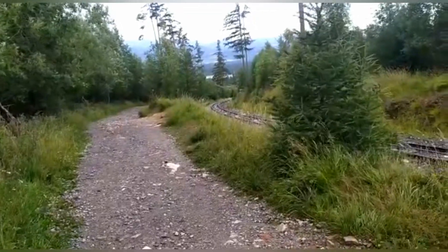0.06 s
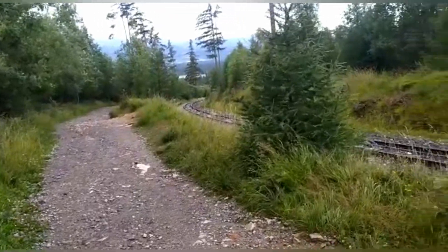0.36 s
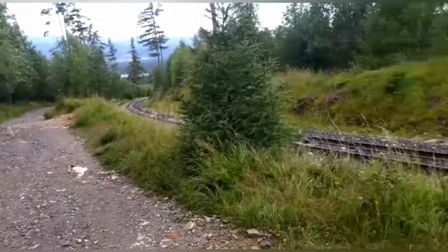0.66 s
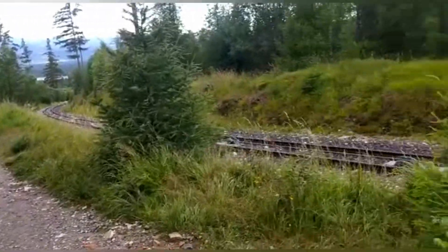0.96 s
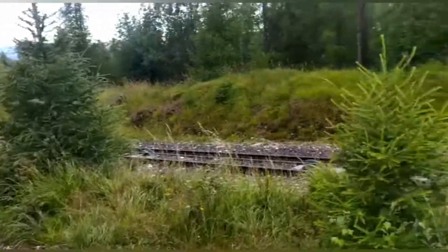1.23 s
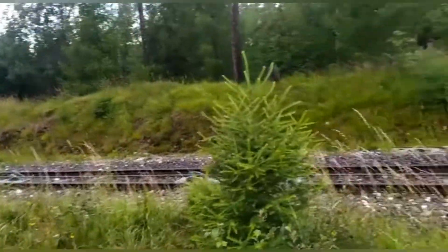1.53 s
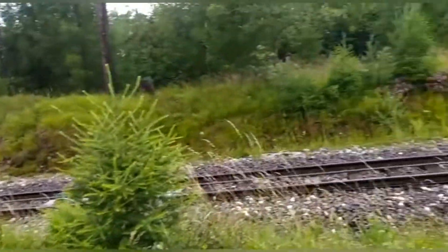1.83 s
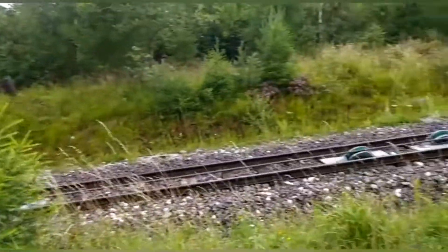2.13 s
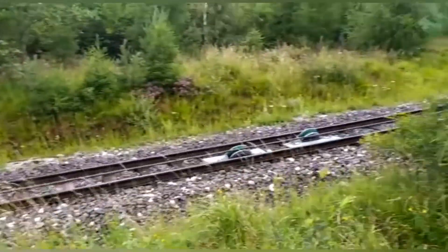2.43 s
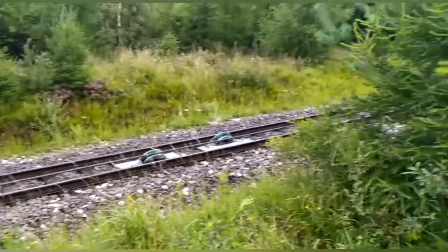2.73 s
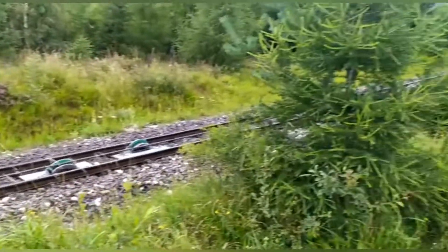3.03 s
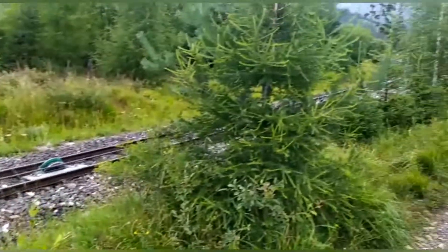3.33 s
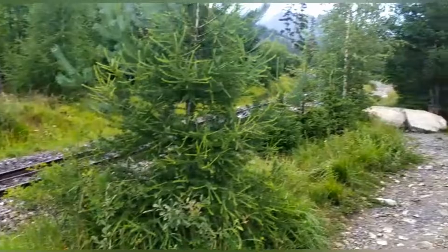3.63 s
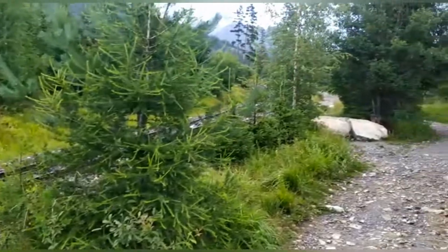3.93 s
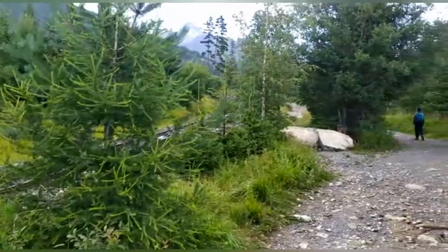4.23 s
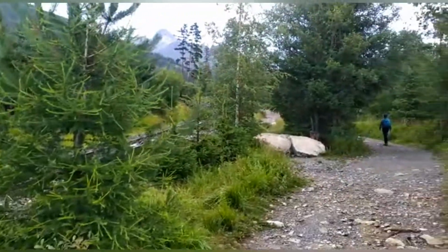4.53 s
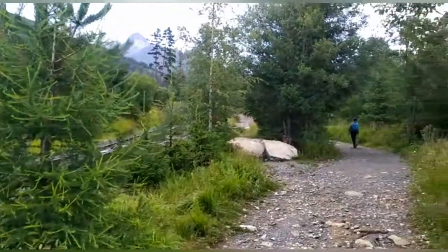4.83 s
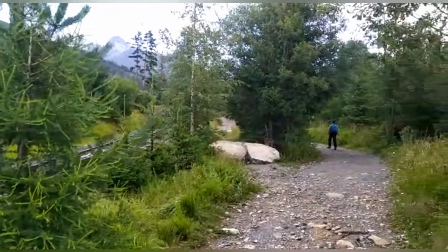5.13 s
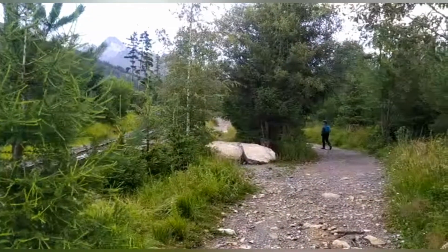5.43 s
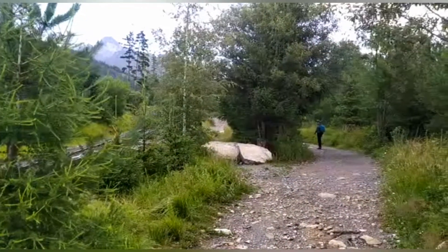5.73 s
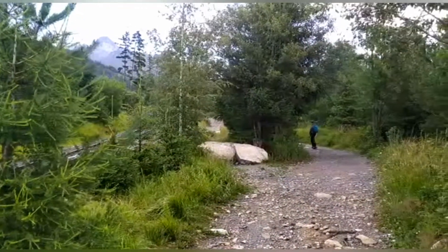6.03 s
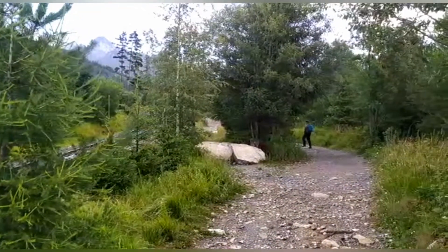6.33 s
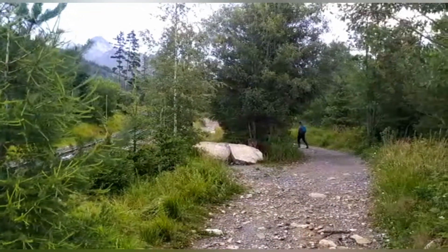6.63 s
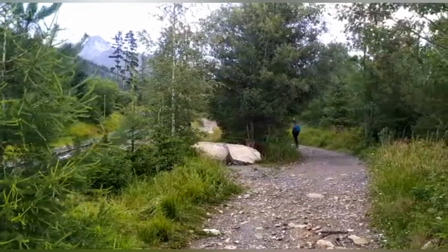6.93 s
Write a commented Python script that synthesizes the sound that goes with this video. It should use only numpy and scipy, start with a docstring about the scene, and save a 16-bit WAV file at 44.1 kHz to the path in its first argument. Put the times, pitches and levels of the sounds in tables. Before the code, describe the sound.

A running haul cable rumbles and hisses over guide wheels, one rattling quickly and metallically, while wind gusts buffet the microphone.

```python
"""Beside a funicular track, the haul cable rumbles and hisses over its guide wheels as a breeze flutters.
From the start, one worn wheel rattles and thumps once a turn, about seven times a second.
Gusts soon buffet a hand-held camera, mostly at its right microphone, and its case ticks in the hand.
Around 3-4 s the wind drops while the camera swings from facing downhill to facing uphill.
Near 5 s the case ticks again and the gusts return, hardest at 6 s; a few last ticks follow."""
import sys
import numpy as np
from scipy import signal
from scipy.fft import rfft, irfft
from scipy.io import wavfile
from scipy.ndimage import uniform_filter1d, map_coordinates

SR = 44100
rng = np.random.default_rng(int(sys.argv[2]) if len(sys.argv) > 2 else 0)


def generate_wav(signal):
    """Clip the signal to [-1, 1] and save it as 16-bit WAV at the path in sys.argv[1]."""
    frames = np.transpose(np.atleast_2d(signal))
    scaled = np.clip(frames, -1, 1) * 32767
    pcm = np.round(scaled).astype(np.int16)
    wavfile.write(sys.argv[1], SR, pcm)


N = 311346
T = np.arange(N) / SR
HZ = np.fft.rfftfreq(N, 1 / SR)


def amp(db):
    """Turns decibels into a gain."""
    return 10 ** (np.asarray(db) / 20)


def unit_rms(x):
    """Scales a signal to an average power of one."""
    return x / np.sqrt(np.mean(x ** 2) + 1e-20)


def curves(rows):
    """Joins the rows of a table into one curve over time per column."""
    times, *columns = np.transpose(rows)
    return [np.interp(T, times, column) for column in columns]


def spectra(rows):
    """Turns each dB column of a table into a gain for every frequency."""
    hz, *columns = np.transpose(rows)
    return [amp(np.interp(np.log(HZ + 1), np.log(hz), column)) for column in columns]


def colour(x, gain):
    """Filters a sound by giving each frequency its own gain."""
    return irfft(rfft(x) * gain, N)


def wander(hz):
    """A smooth random wobble, with speeds up to about hz."""
    return unit_rms(colour(rng.standard_normal(N), np.exp(-(HZ / hz) ** 2)))


def add(mix, start_s, sound):
    """Mixes a sound in at the given time."""
    part = mix[..., max(round(start_s * SR), 0):][..., :sound.shape[-1]]
    part += sound[..., :part.shape[-1]]


def stereo_noise(alike):
    """White noise, left and right: unrelated at alike=0, the same at 1."""
    shared, own = rng.standard_normal((2, N))
    return np.array([alike * shared + np.sqrt(1 - alike ** 2) * own, shared])


def shaped_noise(rows, alike):
    """Stereo noise with a table's spectrum, read as dB in each 1 Hz band."""
    return colour(stereo_noise(alike), spectra(rows)[0] * np.sqrt(SR / 2))


# tone of the rumble: f/Hz, level/dB
RUMBLE_TONE = [(20, -104), (31, -91), (42, -79), (70, -63), (115, -68), (155, -81), (215, -75.5),
               (290, -81), (370, -78), (450, -85), (700, -84.5), (860, -78), (1050, -92.5), (1280, -84),
               (1650, -97.5), (5000, -102), (16000, -122)]
# its deep part swells and ebbs: t/s, level/dB
BASS_SWELL = [(0, -13), (1.9, -4), (2.6, 3.5), (3.25, -4.5), (3.7, 1.5), (4.6, 1)]
def rumble(deep_hz=110):
    """The running cable and the open air make a low, unsteady rumble."""
    noise = shaped_noise(RUMBLE_TONE, alike=0.73) * amp(wander(11))
    bass = colour(noise, np.exp(-(HZ / deep_hz) ** 4))
    return noise + (amp(*curves(BASS_SWELL)) - 1) * bass


# tone of the roar: f/Hz, level/dB
ROAR_TONE = [(300, -100), (620, -94), (820, -87), (1080, -89.5), (1500, -91), (2200, -90), (4000, -115)]
# it fades as the camera turns away: t/s, level/dB
ROAR_FADE = [(0, 5), (1.1, 5.5), (2.7, 1), (3.5, -0.5), (4, -3.5), (7.06, -4)]
def wheel_roar():
    """The long row of guide wheels roars as it rolls."""
    level_db, = curves(ROAR_FADE)
    return shaped_noise(ROAR_TONE, alike=0.28) * amp(level_db + wander(30))


# tone of the hiss: f/Hz, level/dB
HISS_TONE = [(1000, -110), (2100, -97), (2600, -95.5), (3400, -90.5), (4300, -93), (5500, -93.5),
             (6700, -96), (8800, -97.5), (11000, -103), (14000, -112), (16000, -121)]
# it eases along with the roar: t/s, level/dB
HISS_FADE = [(0, 1.5), (3.6, 1.7), (4.7, -1.5), (7.06, -1)]
def cable_hiss():
    """The cable hisses in the grooves of the wheels."""
    level_db, = curves(HISS_FADE)
    return shaped_noise(HISS_TONE, alike=0.067) * amp(level_db + 1.9 * wander(22))


# a low note and its octave: f/Hz, level/dB
DRONE_NOTES = [(193.5, -56), (387, -72.5)]
def cable_drone(waver=0.0045):
    """The running cable hums, wavering a little in pitch and loudness."""
    clock = np.cumsum(1 + waver * wander(2.76)) / SR
    hum = sum(amp(db) * np.sqrt(2) * np.sin(2 * np.pi * hz * clock) for hz, db in DRONE_NOTES)
    return hum * amp(0.62 * wander(11))


def resonate(x, hz, width_hz):
    """Keeps one band around the moving pitch hz, filtering twice for steeper sides."""
    spin = np.exp(2j * np.pi * np.cumsum(hz) / SR)
    feedback = np.exp(-np.pi * width_hz / SR)
    for _ in range(2):
        x = 2 * (spin * signal.lfilter([1 - feedback], [1, -feedback], x / spin)).real
    return x


# a hollow band that sinks as the camera turns: t/s, level/dB, f/Hz
HOLLOW_BAND = [(0, -98.5, 1070), (.6, -84, 1182), (1, -79, 1160), (1.6, -79, 960), (2.2, -83, 950),
               (2.65, -80.5, 952), (3.4, -83.5, 968), (3.9, -88, 890), (4.6, -100, 863)]
def hollow_ring(width_hz=430, flicker_db=3.5, waver=0.073):
    """The rolling wheels resound in one broad band that glides and judders."""
    level_db, hz = curves(HOLLOW_BAND)
    hz = hz * (1 + waver * wander(21))
    noise = stereo_noise(alike=0.32) * np.sqrt(SR / 2)
    return amp(level_db + flicker_db * wander(45)) * resonate(noise, hz, width_hz)


# the breeze at the right microphone: t/s, level/dB, f/Hz
FLUTTER_NOTE = [(1.1, -42.5, 78.35), (1.19, -36.5, 87.7), (1.3, -47, 72.7), (1.41, -31.5, 80.6),
                (1.5, -45, 74.4), (1.62, -26, 76.6), (1.76, -32.5, 87.1), (1.88, -38, 78.7), (2, -56, 65),
                (2.3, -43.5, 73.4), (2.95, -41, 70), (3.1, -73, 72)]
def breeze_flutter(waver=0.03, left_db=-18):
    """Swirls of air leave the camera's edge at a nearly even pace, making a low note."""
    level_db, hz = curves(FLUTTER_NOTE)
    cycles = np.cumsum(hz * (1 + waver * wander(12))) / SR
    note = np.sqrt(2) * np.sin(2 * np.pi * cycles)
    return amp([[left_db], [0]]) * amp(level_db + 1.9 * wander(33)) * note


TURN_S = 0.137307  # the cable's even speed makes every turn equally long
TURN_STARTS = np.arange(0.0825, N / SR, TURN_S)
# knocks within one turn: t/s from the turn's start, level/dB, fade time/s
RIM_KNOCKS = [(-.011, -5.5, 0.0035), (0, -3, 0.015), (.0045, 5.5, 0.0038), (0.0134, -3, 0.037),
              (0.027, -22, .012), (.0475, -9, 0.0015), (.064, -17, 0.0015)]
# louder when the camera points at the worn wheel: t/s, level/dB
WHEEL_LEVEL = [(0, -46.5), (.7, -45.5), (1.32, -43), (1.46, -40), (1.6, -40), (1.87, -38.5), (2.07, -43),
               (2.56, -38), (2.7, -39), (2.83, -41.5), (2.96, -42), (3.1, -38.5), (3.24, -40), (3.38, -36),
               (3.53, -42), (3.93, -44), (4.2, -46), (4.34, -44), (4.48, -46), (5.3, -46), (5.75, -43.5),
               (6.3, -43.5), (7.06, -39.5)]
def rim_chatter(attack_s=0.0007, scatter_db=0.5, looseness=0.098, grit_db=0.5):
    """The worn wheel's loose rim knocks several times a turn, each a gritty burst of noise."""
    power, t = np.zeros(N), np.arange(SR // 7) / SR
    levels = np.interp(TURN_STARTS, *np.transpose(WHEEL_LEVEL))
    levels += scatter_db * rng.standard_normal(len(levels))
    for start, turn_db in zip(TURN_STARTS, levels):
        for delay, knock_db, fade_s in RIM_KNOCKS:
            knock = amp(turn_db + knock_db) * (1 - np.exp(-t / attack_s)) * np.exp(-t / fade_s)
            delay *= 1 + looseness * rng.standard_normal()  # later knocks keep looser time
            add(power, start + delay, knock ** 2)
    return stereo_noise(alike=0.65) * np.sqrt(power) * amp(grit_db * wander(1600))


# overall tone of the rattle: f/Hz, level/dB
RATTLE_TONE = [(200, -19), (1100, -4), (1650, -5), (2100, 3.5), (2550, 1.5), (3300, -10.5), (4000, 3),
               (5000, -1.5), (5900, -2.5), (6600, -3), (8500, -5.5), (11000, -10.5), (14000, -17),
               (16000, -51)]
# the wheel's ringing notes: f/Hz, width/Hz, level/dB facing downhill, level/dB facing uphill
WHEEL_NOTES = [(2740, 60, 1, -12), (2810, 60, -10, -1), (3190, 55, -7, 2), (3490, 80, 4, 0),
               (3615, 45, -10, -2), (4230, 45, 0, 3), (4600, 90, 9, 6), (4852, 42, 11.5, 9),
               (5055, 40, 4, 4), (5170, 35, 6, 4), (5320, 70, 2, -6), (5502, 55, 6, 9.5),
               (5880, 55, 7, 9.5), (6340, 50, 2, -6), (6650, 50, -12, -1), (6888, 40, 4, 7),
               (7160, 45, -1, -15), (7700, 55, -8, 3), (8050, 110, -1, -7), (8650, 50, -1, -15),
               (9520, 80, -4, -10), (10000, 130, -5, 2), (10700, 70, -2, -3), (11570, 180, -6, 2),
               (12050, 140, -4, 2)]
def wheel_rattle(level_db=2, ring_db=2):
    """The knocks set the metal wheel ringing at many pitches."""
    rings = sum(amp([[down_db], [up_db]]) / (1 + 2j * (HZ - hz) / width)
                for hz, width, down_db, up_db in WHEEL_NOTES)
    tone = spectra(RATTLE_TONE)[0] * (1 + amp(ring_db) * rings)
    downhill, uphill = tone / np.sqrt(np.mean(abs(tone) ** 2, axis=1, keepdims=True))
    return amp(level_db) * camera_swing(rim_chatter(), downhill, uphill)


# boosts and cuts to the rattle: t/s, clang level/dB, sizzle level/dB
RATTLE_SHINE = [(0, -2, -3), (1.5, -1, -0.5), (1.85, -1.5, 1.5), (2.2, -1.5, 3.5), (2.5, 0.5, -2),
                (2.86, 4.5, -2.5), (3.12, 1.5, -2.5), (3.38, 1.5, 1.5), (4, 4.5, 1.5), (5.1, 1.5, 4.5),
                (5.8, 0.5, 0.5), (7.06, -1.5, -2.5)]
def clang_and_sizzle(rattle, clang_hz=4780, width_hz=950, sizzle_hz=6500):
    """The rattle's clang and top treble swell and fade over time."""
    clang_db, sizzle_db = curves(RATTLE_SHINE)
    clang = colour(rattle, np.exp(-((HZ - clang_hz) / width_hz) ** 2))
    sizzle = colour(rattle, 1 - np.exp(-(HZ / sizzle_hz) ** 8))
    return rattle + (amp(clang_db) - 1) * clang + (amp(sizzle_db) - 1) * sizzle


# the cable's ring, strongest when the camera faces it: t/s, level/dB, f/Hz
CABLE_SONG = [(0, -1.5, 3300), (1.4, -9, 3240), (1.8, 7, 3113), (2.6, 5.5, 3330), (3.2, -1.5, 3360),
              (3.7, 4, 3200), (4.6, 0.5, 3300), (7.06, -9, 3300)]
def cable_singing(rattle, boost_db=8, width_hz=560, echo_s=0.06):
    """Each knock shakes the tight cable, which rings on in one metallic band."""
    level_db, hz = curves(CABLE_SONG)
    t = np.arange(SR // 8) / SR
    tail = rng.standard_normal((2, len(t))) * np.exp(-t / echo_s)
    tail /= np.linalg.norm(tail, axis=1, keepdims=True)
    echoes = signal.oaconvolve(rattle, tail, axes=1)[:, :N]  # these run along the cable
    return amp(level_db + boost_db) * resonate(rattle + 0.5 * echoes, hz, width_hz)


# a strong and a weak push each turn: t/s from the turn's start, level/dB, timing scatter/s
WHEEL_PUSHES = [(-.004, 2.5, 0.00075), (0.06, -14, 0.00356)]
# low notes of the track bed: f/Hz, level/dB, time to fade by 60 dB/s
BED_NOTES = [(61.8, -39.5, 0.26), (77.8, -49.5, 0.62), (108.3, -38, 0.082), (180, -39, 0.056)]
def wheel_thumps(level_db=1.5, scatter_db=2, rise_s=0.0059, follow=0.2):
    """The wheel is not quite round, so it pushes on the track bed, which booms briefly."""
    out, t = np.zeros(N), np.arange(SR // 2) / SR
    thump = -sum(amp(db - 60 * t / fade_s) * np.sin(2 * np.pi * hz * t) for hz, db, fade_s in BED_NOTES)
    thump *= 1 - np.exp(-t / rise_s)
    for start in TURN_STARTS:
        for delay, db, scatter_s in WHEEL_PUSHES:
            size, slip = rng.standard_normal(2)
            add(out, start + delay + scatter_s * slip, amp(db + scatter_db * size) * thump)
    wheel_db, = curves(WHEEL_LEVEL)
    swell_db = follow * (wheel_db - wheel_db.mean())  # a share of the rattle's rise and fall
    return amp(level_db + swell_db) * colour(out, 1 - np.exp(-(HZ / 45) ** 6))


# single gusts: t/s, level/dB, half length/s, brightness/dB, f/Hz, glide/(Hz per s)
WIND_GUSTS = [(0.335, -27, 0.028, 0.5, 80.2, -400), (0.483, -23.5, 0.043, 5.5, 120.9, 452.5),
              (0.641, -19, 0.011, 8.5, 128.8, 0), (.659, -21, .012, 7, 252, 0),
              (0.827, -25, 0.026, 5, 223.6, -3), (0.911, -26, 0.02, 0, 102.4, -300),
              (1.063, -28.5, 0.023, -2.5, 130.7, -300), (1.61, -31, 0.04, 3.5, 150, -10),
              (2.112, -31, 0.02, 5, 151.6, 5), (4.934, -42, 0.12, -6, 69.83, -0.5),
              (5.211, -29.5, 0.042, -4.5, 89.9, -4), (5.474, -18.5, 0.011, 0, 116, -400),
              (5.505, -24, .01, 8, 165, -9.5), (5.575, -25, .018, -4, 116, 0),
              (5.641, -17.5, 0.016, -8, 98.9, 597), (5.745, -18, 0.028, -12, 71.2, 591),
              (5.828, -15, 0.025, 14, 117.8, 892), (5.872, -14.5, .012, 18, 160.6, 0),
              (5.92, -16.5, 0.027, 11, 184.4, -900), (5.978, -6.5, 0.018, 11, 138.4, -600),
              (6.018, -9, 0.021, 3, 80.7, -200), (6.144, -21, 0.06, -6, 78.14, -200),
              (6.26, -18.5, .03, -0.5, 83, -700), (6.434, -22.5, 0.024, -10, 60.8, 0),
              (6.625, -17, 0.021, -4, 94.6, 3), (6.754, -23, 0.022, -8, 74.6, 0),
              (6.892, -26.5, 0.028, -8, 69.6, -4), (7.039, -20, 0.038, -6.5, 54.8, -2)]
def gust_notes(waver=0.0725, lumpy_db=1.5, octave_db=-11):
    """Each gust sheds a row of swirls: a short, throaty note, with more octave if the gust is sharp."""
    out = np.zeros(N)
    drift = 1 + waver * wander(40)
    lumps = amp(lumpy_db * wander(62))
    for peak_s, db, length, bright_db, hz, glide in WIND_GUSTS:
        near = abs(T - peak_s) < 3.5 * length
        t = T[near] - peak_s
        phase = 2 * np.pi * (rng.random() + np.cumsum((hz + glide * t) * drift[near]) / SR)
        octave = amp(octave_db) / (1 + amp(-bright_db))
        swell = amp(db) * np.exp(-0.5 * (t / length) ** 2)
        out[near] += swell * np.sqrt(2) * (np.sin(phase) + octave * np.sin(2 * phase))
    return out * lumps


def rough_air(tone, lumpy_db, lumpy_hz):
    """Churning air makes low noise; slow swings are evened out and quick lumps added."""
    noise = colour(stereo_noise(alike=0.45), spectra(tone)[0])
    noise /= np.sqrt(uniform_filter1d(noise ** 2, size=1800, axis=1) + 1e-20)
    return noise * unit_rms(amp(lumpy_db * wander(lumpy_hz)))


# tones of the wind's deep push and of its small swirls: f/Hz, level/dB
PUSH_TONE = [(20, -60), (31, -27), (41, -13), (55, 2.5), (85, 2.5), (130, -3), (190, -14.5), (300, -28),
             (600, -51), (1500, -97)]
SWIRL_TONE = [(50, -16), (110, -2), (165, 4.5), (245, -1), (320, -9.5), (450, -16.5), (620, -24.5),
              (900, -39.5), (1500, -56), (4000, -62.5)]
# the wind between gusts: t/s, level/dB
BREEZE_LEVEL = [(.15, -74), (.4, -47), (.9, -34.5), (1.25, -40.5), (2.25, -36), (2.7, -45.5), (3, -58),
                (4.8, -60.5), (5.35, -29), (5.6, -25.5), (5.75, -19.5), (5.95, -24), (6.08, -25),
                (6.33, -31), (6.52, -43), (6.8, -36), (7.06, -37)]
# the left microphone is sheltered, except just after the swing: t/s, level/dB
LEFT_WIND = [(4.3, -25), (4.92, 9.5), (5.2, -8.5), (5.5, -15.5), (6.3, -23.5), (7.06, -14)]
def wind(level_db=-1, swirl_db=-7, note_share=0.47):
    """Breeze and gusts push on the microphones; sharper ones shed small swirls that sound higher."""
    breeze_db, = curves(BREEZE_LEVEL)
    breeze_power = amp(breeze_db + 0.5 * wander(8)) ** 2
    breeze_bright_db = -3 + 0.5 * (breeze_db - breeze_db.max())  # stronger is brighter
    blows = [(breeze_power, breeze_bright_db)]
    for peak_s, db, length, bright_db, *_ in WIND_GUSTS:
        power = (1 - note_share) * amp(db) ** 2 * np.exp(-((T - peak_s) / length) ** 2)
        blows.append((power, bright_db))
    push, swirl = np.zeros((2, N))
    for power, bright_db in blows:
        swirl_to_push = amp(swirl_db + bright_db) ** 2
        push += power / (1 + swirl_to_push)
        swirl += power * swirl_to_push / (1 + swirl_to_push)
    air = np.sqrt(push) * rough_air(PUSH_TONE, lumpy_db=1, lumpy_hz=30.2)
    air += np.sqrt(swirl) * rough_air(SWIRL_TONE, lumpy_db=2.5, lumpy_hz=71)
    air += np.sqrt(note_share) * gust_notes()
    air[0] *= amp(*curves(LEFT_WIND))
    return amp(level_db) * colour(air, 1 - np.exp(-(HZ / 37) ** 6))  # the deepest bass cannot get in


# ticks and creaks: t/s, level/dB, f/Hz, time to fade by 60 dB/s, left minus right/dB
CASE_TICKS = [(1.3665, -11.5, 890, 0.0015, 24), (1.3667, -13, 1990, 0.0011, 24),
              (1.367, -30, 318, 0.015, 23), (1.5407, -20.5, 640, 0.0044, 26),
              (5.0054, -2, 3060, 0.00053, 31), (6.317, -21, 1350, 0.00097, 18),
              (6.394, -33, 2130, 0.021, -21), (6.3973, -35.5, 1006, 0.019, -12),
              (6.3997, -31.5, 2240, 0.023, -19)]
def case_ticks():
    """The case gives under the fingers: very short rings, each close to one microphone."""
    out, t = np.zeros((2, N)), np.arange(SR // 20) / SR
    for start, db, hz, fade_s, side_db in CASE_TICKS:
        ring = amp(db - 60 * t / fade_s) * np.sin(2 * np.pi * hz * t)
        band = signal.butter(3, [hz / 2, min(3 * hz, 12000)], "band", fs=SR, output="sos")
        sides = amp(np.minimum([[side_db], [-side_db]], 0))
        add(out, start, sides * signal.sosfilt(band, ring))
    return out


# where the camera points: t/s, direction (0 downhill, 1 uphill)
FACING = [(2.7, 0.19), (4.3, 0.82)]
def camera_swing(x, downhill, uphill):
    """As the camera turns, a sound's downhill tone blends toward its uphill tone."""
    facing, = curves(FACING)
    return (1 - facing) * colour(x, downhill) + facing * colour(x, uphill)


# tone on the left side: f/Hz, level/dB facing downhill, level/dB facing uphill
LEFT_TONE = [(99, 3.5, -2), (460, -7, 1), (820, -3.5, -0.5), (1160, -16, 1.5), (1690, -12, -5),
             (2370, -13, -4.5), (3320, -2.5, 3), (3780, -1, 1.5), (4800, -8, -1.5), (5860, -12.5, 2.5),
             (6300, -22, -7.5), (7900, -26, -9.5), (10400, -16, -21)]
# how much later the left side hears the track (below zero is earlier): t/s, delay/ms
LEFT_DELAY = [(0, -.18), (1.1, -.33), (1.6, -.28), (2.1, -.12), (2.6, .07), (3, .25), (3.8, .39),
              (4.6, .45)]
def dull_and_shift_left(track, in_step_hz=4560):
    """The left side sounds duller, most of all above 6 kHz and early on; it first leads, then lags."""
    delay_ms, = curves(LEFT_DELAY)
    left = camera_swing(track[0], *spectra(LEFT_TONE))
    low = colour(left, np.exp(-(HZ / in_step_hz) ** 20))  # only this part is shifted in time
    shifted = map_coordinates(low, [(T - delay_ms / 1000) * SR], order=3, mode="mirror")
    return np.array([shifted + left - low, track[1]])


def shimmer(x, depth_db, frames):
    """Narrow bands above the bass drift louder and softer, over a span of frames (about 3 ms each)."""
    hz, _, bands = signal.stft(x, SR, nperseg=512, noverlap=384)
    drift = uniform_filter1d(rng.standard_normal(bands.shape[:0:-1]), size=frames, axis=0)
    drift = unit_rms(uniform_filter1d(drift, size=2, axis=1)).T
    above_bass = np.clip((hz - 400) / 500, 0, 1)[:, None]
    bands *= amp(depth_db * above_bass * drift)
    return signal.istft(bands, SR, nperseg=512, noverlap=384)[1][:, :N]


def scene():
    """The track as the two microphones hear it, plus the air and fingers on the camera itself."""
    rattle = wheel_rattle()
    metal = shimmer(clang_and_sizzle(rattle) + cable_singing(rattle), depth_db=2.5, frames=70)
    cable = shimmer(rumble() + wheel_roar() + cable_hiss() + cable_drone(), depth_db=1.9, frames=40)
    track = metal + cable + hollow_ring() + wheel_thumps()
    return dull_and_shift_left(track) + wind() + breeze_flutter() + case_ticks()


def record(dry):
    """Cuts off the very highest treble, above 15650 Hz."""
    low_pass = signal.firwin(511, 15650, window=("kaiser", 9), fs=SR)
    return signal.oaconvolve(dry, low_pass[None], "same")


dry = scene()
out = record(dry)
generate_wav(out)
```